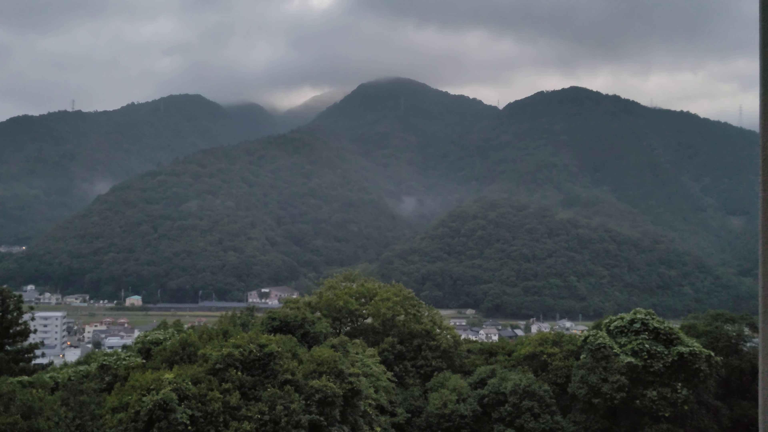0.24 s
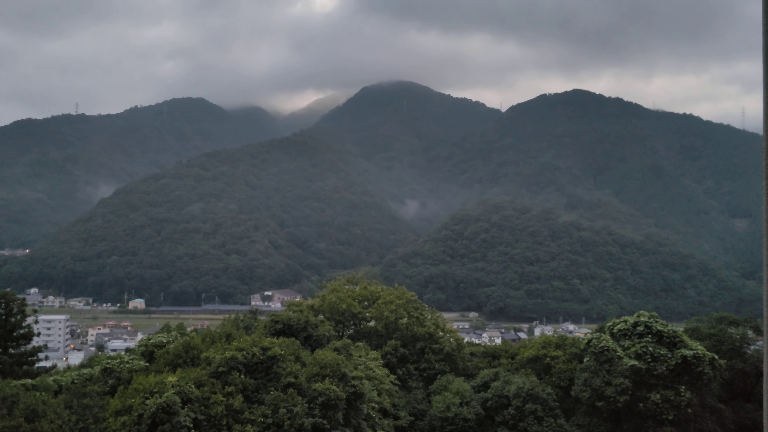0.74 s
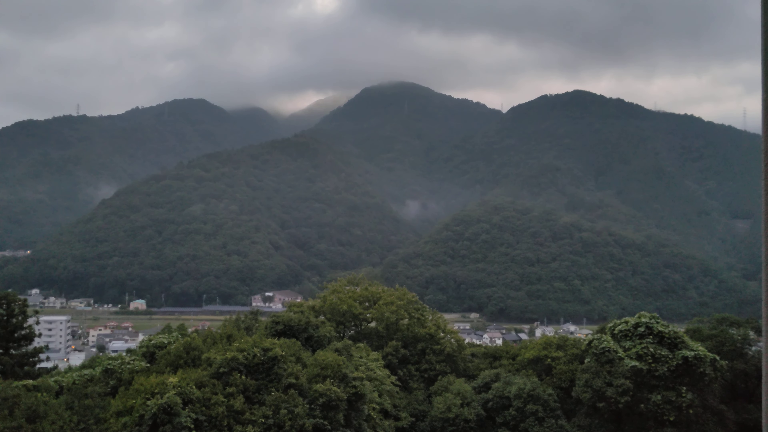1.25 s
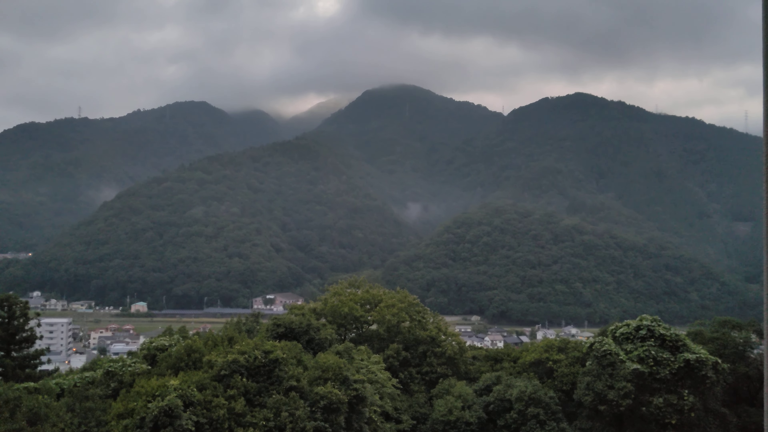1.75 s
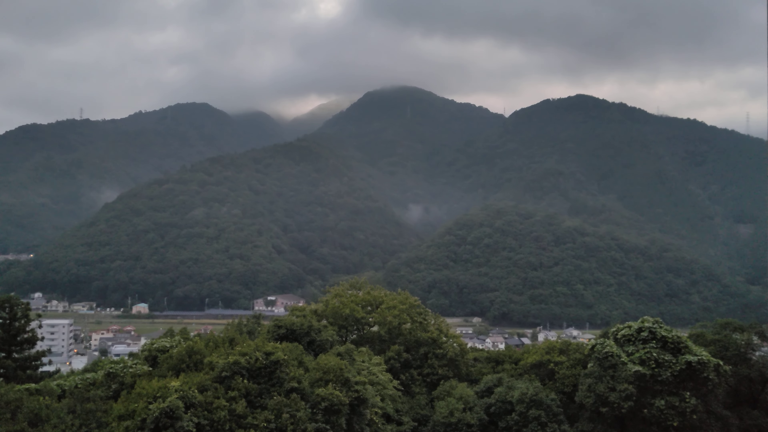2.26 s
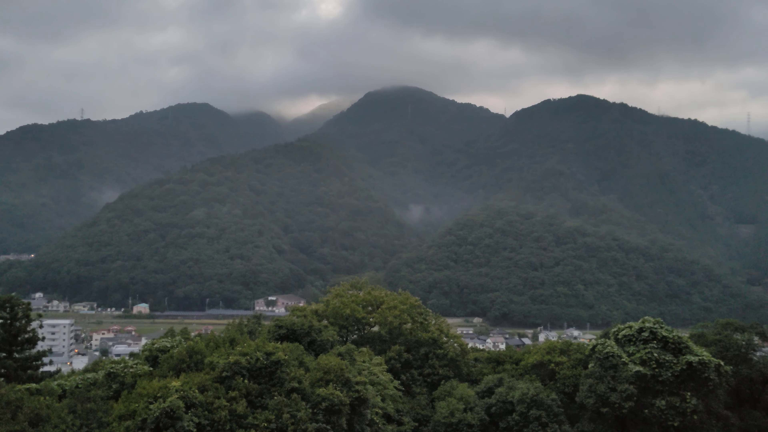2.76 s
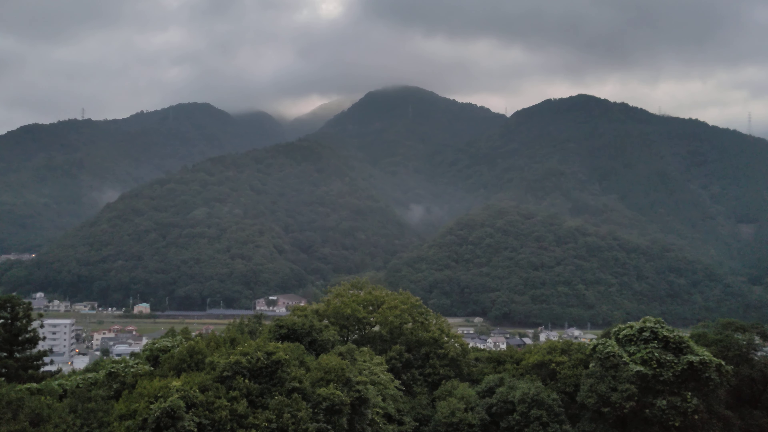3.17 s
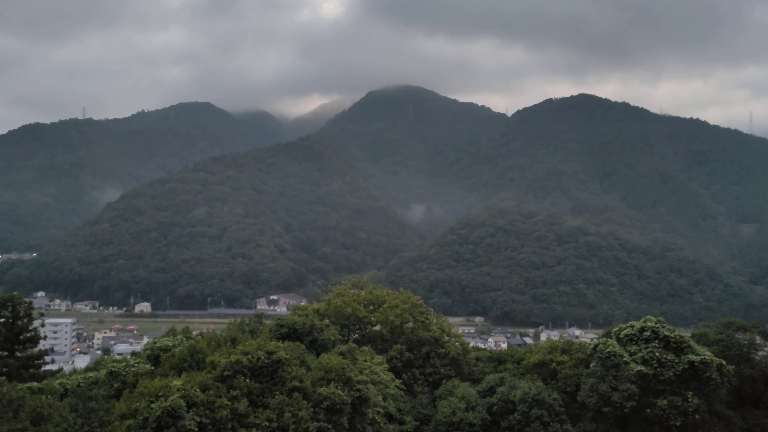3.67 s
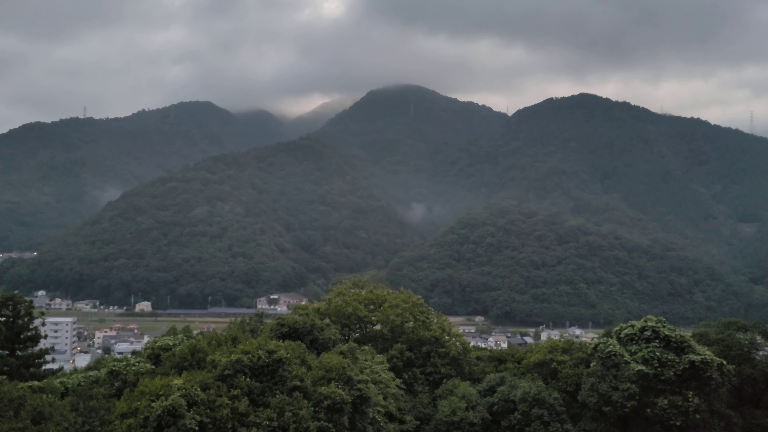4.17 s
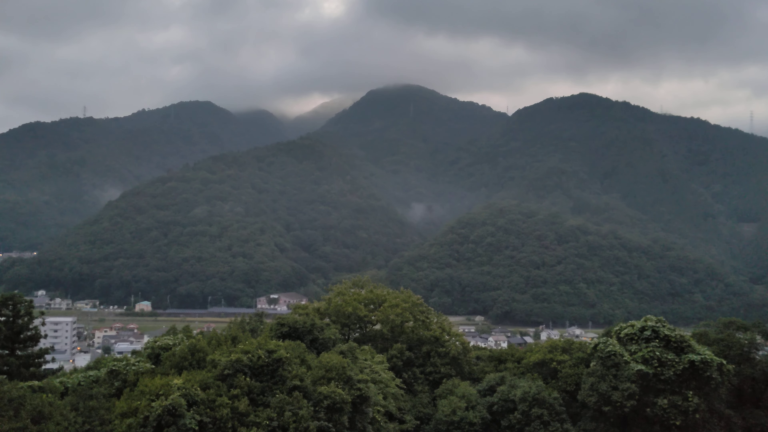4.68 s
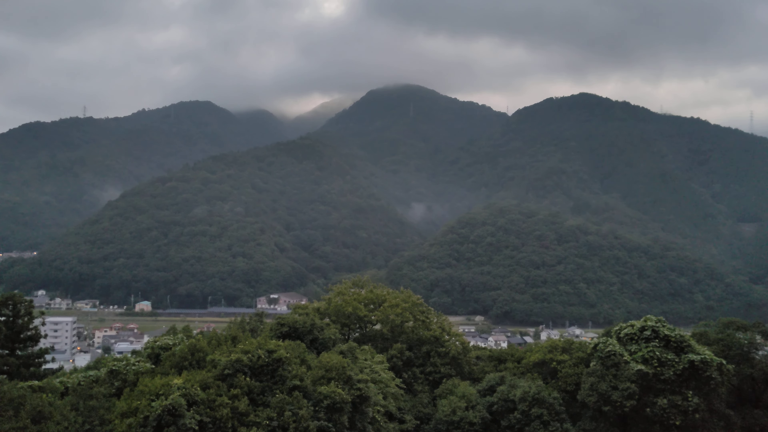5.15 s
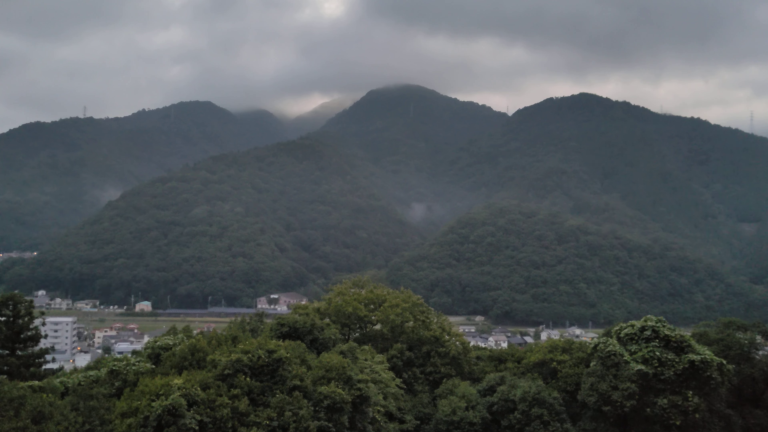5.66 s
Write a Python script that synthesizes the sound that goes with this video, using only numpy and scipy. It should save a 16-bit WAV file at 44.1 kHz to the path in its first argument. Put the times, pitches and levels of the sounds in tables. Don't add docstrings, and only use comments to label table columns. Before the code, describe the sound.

Many insects fill wet-looking green trees: a fine sizzling buzz and far cicadas trilling about eight syllables a second, blurred by the forest. Deep valley rumble with a slow throb runs throughout. Light wind puffs and dull bumps press on the open stereo microphone, often to the left. Sparse faint bird chirps appear. Late on, a close cicada warms up quietly, climbs, and sings loud, bright pulses until the cut.

```python
import sys
import numpy as np
from scipy import signal
from scipy.fft import rfft, irfft
from scipy.io import wavfile

SR = 44100
rng = np.random.default_rng(int(sys.argv[2]) if len(sys.argv) > 2 else 0)


def volts_from_db(level):
    exponent = np.asarray(level, float) / 20
    return 10 ** exponent


def master_out(mix):
    frames = np.transpose(np.atleast_2d(mix))
    ceiling = np.clip(frames, -1, 1)
    pcm = np.round(ceiling * 32767).astype(np.int16)
    wavfile.write(sys.argv[1], SR, pcm)


N = 261072
T = np.arange(N) / SR
BINS_HZ = np.fft.rfftfreq(N, 1 / SR)


def evened(x):
    return x / np.sqrt(np.mean(x ** 2) + 1e-20)


def read(points, hz):
    f, value = np.transpose(points)
    return np.interp(np.log(hz + 1), np.log(f + 1), value)


def curves(rows):
    s, *columns = np.transpose(rows)
    return [np.interp(T, s, c) for c in columns]


def coloured(x, tone):
    return evened(irfft(rfft(x) * volts_from_db(read(tone, BINS_HZ)), N))


def panned(x, pan_db):
    half = volts_from_db(np.atleast_1d(pan_db) / 2)
    return x * np.array([half, 1 / half])


def wander(hz, t=T):
    return np.interp(t * hz, np.arange(1000), rng.standard_normal(1000))


def stretch(start, end):
    return slice(max(round(start * SR), 0), min(round(end * SR), N))


def resonate(x, hz, width):
    turn = np.exp(2j * np.pi * np.cumsum(hz + 0 * T) / SR)
    r = np.exp(-np.pi * width / SR)
    return 2 * (turn * signal.lfilter([1 - r], [1, -r], x / turn)).real


def forest(x, t60=.5, top_t60=.25):
    hz, t, z = signal.stft(rng.standard_normal((2, SR // 2)), SR, nperseg=256)
    decay_s = read([(2000, t60), (11000, top_t60)], hz)[:, None]
    tail = signal.istft(z * volts_from_db(-60 * t / decay_s), SR, nperseg=256)[1]
    return signal.fftconvolve(x, tail / np.linalg.norm(tail[0]), axes=1)[:, :N]


def town():
    # (frequency [Hz], density [dB per Hz])
    wash_tone = [(20, -0.5), (60, -8.5), (100, -6), (200, -11.5), (300, -13.5), (500, -20), (1000, -19.5),
                 (1320, -16.5), (1650, -25.5), (2500, -25), (3050, -24.5), (3500, -24.5), (5000, -23.5),
                 (14000, -59)]
    # (time [s], level [dB])
    wash_level = [(0, -54), (.95, -56.5), (1.8, -55.5), (2.5, -56), (3.1, -55), (4.4, -56.5), (5.92, -53)]
    # (frequency [Hz], likeness [0-1])
    likeness = [(60, 0.97), (130, 0.94), (280, 0.87), (620, 0.38), (1340, 0.22), (3000, 0.014)]
    # (frequency [Hz], width [Hz], level [dB])
    machines = [(35.66, 2.8, -54), (123.6, 5.4, -58), (178.2, 8.3, -67.5), (250.4, 34, -65),
                (370.5, 22, -70)]

    left, other = rfft(rng.standard_normal((2, N)))
    same = np.clip(read(likeness, BINS_HZ), 0, 1)
    right = same * left + np.sqrt(1 - same ** 2) * other
    wash = coloured(irfft(np.array([left, right]), N), wash_tone)
    wash = wash * volts_from_db(curves(wash_level)[0] + 4.5 + .7 * wander(6))

    hum = sum(volts_from_db(db) * evened(resonate(rng.standard_normal(N), hz, width)) for hz, width, db in machines)
    drone_hz, beat_hz, beat_peak_s, second_db = 73.15, 1.87, 5.28, -9
    drone_db, drone_rise_db_per_s = -57, 0.99
    since_peak = T - beat_peak_s
    pair = np.cos(2 * np.pi * drone_hz * since_peak)
    pair = pair + volts_from_db(second_db) * np.cos(2 * np.pi * (drone_hz - beat_hz) * since_peak)
    hum = hum + volts_from_db(drone_db + drone_rise_db_per_s * T + 1.1 * wander(12)) * np.sqrt(2) * pair
    fan_hz, fan_db = 177.7, -65
    hum = hum + volts_from_db(fan_db + 2.0 * wander(5.2)) * np.sqrt(2) * np.sin(2 * np.pi * fan_hz * T)
    wash += panned(hum, -1.5)
    return np.array([np.roll(wash[0], 6), wash[1]])


def wind():
    # (frequency [Hz], density [dB per Hz])
    wind_tone = [(5, -4), (12, 3.5), (25, 0.5), (45, -4.5), (80, -15.5), (150, -34), (400, -60),
                 (2000, -100)]
    # (time [s], level [dB])
    breeze = [(0, -48.5), (3.9, -51.5), (5.1, -52.5), (5.92, -61)]
    # (centre [s], length [s], level [dB], left-right [dB])
    gusts = [(0.382, 0.17, -42.5, -4), (.74, .08, -42.5, 7), (0.855, 0.088, -43, -9), (1.21, 0.11, -52, 10),
             (1.624, 0.38, -40.5, 3), (1.98, 0.2, -47.5, 0), (2.85, 0.12, -41, -5), (3.02, 0.056, -50, 19),
             (3.295, 0.054, -34.5, -1), (3.476, 0.11, -55, 5), (3.904, 0.18, -42, 1),
             (4.253, .12, -47.5, 14), (4.49, 0.062, -40, -2), (4.9, .2, -47.5, 3), (5.323, 0.27, -47, -5),
             (5.864, 0.09, -48, -4)]
    # (centre [s], peak [dB], frequency [Hz], left-right [dB])
    eddies = [(2.451, -36, 60.4, 24), (2.822, -27, 55, 5), (2.975, -30, 50, -8), (3.931, -34, 70, 10),
              (4.019, -32.5, 60, 13), (4.078, -33, 60.4, 27), (4.231, -28, 55, 23), (4.285, -32.5, 45, 17),
              (4.455, -34, 60, 18), (4.75, -30.5, 65, 28)]

    power = volts_from_db(curves(breeze)[0] + 4.4 * np.array([wander(10), wander(17)])) ** 2
    for centre, length, db, pan_db in gusts:
        gust = volts_from_db(db) * np.exp(-(2 * (T - centre) / length) ** 2)
        power = power + panned(gust, pan_db) ** 2
    out = coloured(rng.standard_normal((2, N)), wind_tone) * np.sqrt(power) * volts_from_db(3.0)
    for centre, db, hz, pan_db in eddies:
        span = stretch(centre - .06, centre + .06)
        turns = (T[span] - centre) * hz
        bump = np.sin(2 * np.pi * (turns + 0.21)) * np.exp(-(turns / 0.52) ** 2)
        out[:, span] += panned(volts_from_db(db - abs(pan_db) / 2) * bump, pan_db)
    return out


def buzz():
    # (time [s], level [dB])
    buzz_level = [(0, -53.5), (.9, -53), (1.1, -54.5), (2.5, -55), (3.8, -54.5), (4.4, -54.5), (5.0, -52.5),
                  (5.92, -51.5)]
    # (frequency [Hz], density [dB per Hz])
    body_tone = [(4600, -50), (5200, -31.5), (5900, -18.5), (6900, -16.5), (7700, -8.5), (8300, -10.5),
                 (8800, -15.5), (9500, -29.5), (10600, -27), (11300, -35.5), (12500, -35), (14300, -35.5)]

    clicks = np.zeros((2, N))
    for k, rate in enumerate(rng.random(10)):
        click_hz = (200 + 60 * rate) * (1 + .15 * wander(60))
        turns = np.cumsum(click_hz) / SR
        clicks[k % 2] += np.diff(np.floor(turns), prepend=0) * (1 + 0.19 * wander(11))
    scattered = forest(clicks + 0.15 * clicks[::-1], t60=0.5, top_t60=0.14)
    mix = evened(clicks) * 0.17 + evened(scattered)
    return coloured(mix, body_tone) * panned(volts_from_db(curves(buzz_level)[0] + 5.5), 1.1)


def bird():
    # (crest [s], rise [s], fall [s], top [Hz], level [dB])
    chirps = [(.40, .01, 0.1, 3260, -63), (.88, .001, 0.08, 3230, -58.5), (1.42, 0.032, 0.11, 3160, -64),
              (1.885, 0.054, .09, 3600, -60), (2.47, .001, 0.09, 3200, -62.5), (3.0, .001, 0.11, 3280, -66),
              (3.58, 0.062, 0.038, 3680, -61), (5.07, .001, 0.061, 3230, -64), (5.7, .001, .07, 3280, -71)]
    bend_hz_per_s2 = 87000

    out = np.zeros(N)
    for crest, rise, fall, top_hz, db in chirps:
        span = stretch(crest - rise, crest + fall)
        t = T[span]
        u = (t - crest + rise) / (rise + fall)
        hz = top_hz - bend_hz_per_s2 * (t - crest) ** 2 + 60 * wander(160, t)
        swell = volts_from_db(db) * np.sin(np.pi * u) * (1 + .5 * wander(150, t))
        out[span] += swell * np.sin(2 * np.pi * np.cumsum(hz) / SR)
    out = panned(out, -3.5)
    return out + volts_from_db(-2) * forest(out, t60=.25, top_t60=.2)


def voice(t, hz, beats, column, depth_db, rough, count=3):
    # (multiple of the pitch, near level [dB], far level [dB])
    harmonics = [(1, -4, -4), (2, 1, 3), (3, -10, -8), (4, -2, -14), (5, -11.5, -22), (6, -27, -40)]
    # (pitch factor, level [dB], unsteadiness [share of pitch])
    undertones = [(1, 0, .001), (.979, -8, .003), (.958, -14, .007)]

    cycle = np.arange(4096) / 4096
    knots = slice(0, None, 64)
    out = 0
    for k, (factor, db, jitter) in enumerate(undertones[:count]):
        partials = (volts_from_db(row[column]) * np.cos(2 * np.pi * (row[0] * cycle + rng.random())) for row in harmonics)
        shape = evened(sum(partials))
        turns = np.cumsum(hz * factor * (1 + rough * jitter * wander(120, t))) / SR
        beat_phase = 2 * np.pi * beats[knots]
        throb = np.cos(beat_phase + .5 * np.sin(beat_phase)) - 1
        swell = volts_from_db(db + depth_db / (2 + k) * throb + (1.2 + k) * wander(70, t[knots]))
        out = out + np.interp(t, t[knots], swell) * shape[(turns * 4096).astype(int) % 4096]
    return out


def chorus():
    # (time [s], level [dB])
    crowd_level = [(0, 4), (.9, 0.5), (1.1, -1.5), (2.2, -1), (2.7, -3.5), (3.2, -1.5), (3.6, 1), (5.92, 2)]
    # (start [s], end [s], first pitch [Hz], level [dB], syllables [per s])
    left_phrases = [(-.31, 1.5, 2005, -3, 8.1), (1.55, 2.35, 1979, -5, 6.7), (1.97, 4.0, 1968, -7, 7.5)]
    right_phrases = [(-.326, 2.3, 2172, 0, 8.2), (-.32, 3.3, 2240, -5, 8.3), (3.314, 3.9, 2190, 0, 8.6),
                     (4.62, 6, 2305, -8, 8.4)]
    left_pan_db, right_pan_db, sag_hz_per_s = 2, -5, 10.

    clear, crowd = np.zeros((2, 2, N))
    for phrases, pan_db in ((left_phrases, left_pan_db), (right_phrases, right_pan_db)):
        for start, end, first_hz, db, rate in phrases:
            span = stretch(start, end)
            t = T[span]
            hz = first_hz - sag_hz_per_s * (t - start)
            fade = np.clip(np.minimum(t - start, end - t) / 0.093, 0, 1)
            phrase = voice(t, hz, (t - start) * rate, column=2, depth_db=12.5, rough=1, count=2)
            clear[:, span] += panned(volts_from_db(db) * fade * phrase, pan_db)

    for k, (place, beat, rate) in enumerate(rng.random((12, 3))):
        hz = 1975 + 330 * (k + place) / 12 - 5 * T
        heard_db = -9 * ((hz[0] - 2130) / 150) ** 2
        beats = beat + (7 + 2.2 * rate) * T
        crowd[k % 2] += volts_from_db(heard_db) * voice(T, hz, beats, column=2, depth_db=16.5, rough=12, count=1)
    crowd = evened(forest(crowd + 0.4 * crowd[::-1], t60=0.84, top_t60=0.17))
    crowd = crowd * panned(volts_from_db(curves(crowd_level)[0] - 51.0), -3.5)
    return crowd + volts_from_db(-58.5) * (clear + volts_from_db(-2) * forest(clear, t60=0.58, top_t60=0.74))


def near_cicada():
    syllables = [4.2, 4.32, 4.42, 4.514, 4.617, 4.732, 4.846, 4.966, 5.075, 5.19, 5.305, 5.43, 5.56, 5.683,
                 5.803, 5.925]
    # (time [s], level [dB])
    effort = [
        (3.25, -34),
        (3.5, -32),
        (4.4, -16),
        (4.55, -5),
        (4.85, -0.5),
        (5.92, 1.5),
    ]
    # (time [s], frequency [Hz])
    pitch = [
        (3.25, 2065),
        (4.5, 2105),
        (4.8, 2148),
        (5.0, 2146),
        (5.92, 2113),
    ]
    # (frequency [Hz], lead [rad])
    left_lead = [(2130, -1.8), (4260, -.2), (6400, -1.6), (8500, -3.5), (10600, -5.8)]
    warmup_per_s = 6.9

    span = stretch(3.25, 6)
    t = T[span]
    hz, level_db = curves(pitch)[0][span], curves(effort)[0][span]
    beats = np.interp(t, syllables, np.arange(len(syllables)))
    beats = beats + np.minimum(t - syllables[0], 0) * warmup_per_s
    song = np.zeros(N)
    song[span] = voice(t, hz, beats, column=1, depth_db=12.5, rough=1) * volts_from_db(level_db - 41.5)
    song = panned(song, -3.0)
    song[0] = irfft(rfft(song[0]) * np.exp(1j * read(left_lead, BINS_HZ)), N)
    return song + volts_from_db(-3) * forest(song, t60=.22, top_t60=.2)


def scene():
    return town() + wind() + buzz() + bird() + chorus() + near_cicada()


def band_limit(x):
    return signal.sosfilt(signal.butter(12, 14340, fs=SR, output="sos"), x)


def record(dry):
    # (frequency [Hz], left-right [dB])
    shade = [(600, 0), (1300, -2), (2100, -1), (2950, -5), (4200, 1), (6300, -6), (7700, 3), (8500, 0.5)]
    shaded = irfft(panned(rfft(dry), read(shade, BINS_HZ)), N)
    return band_limit(shaded)


dry = scene()
out = record(dry)
master_out(out)
```